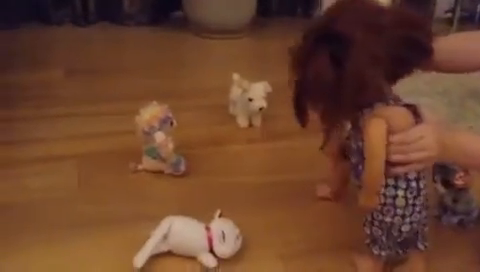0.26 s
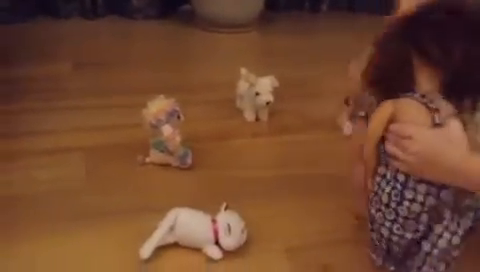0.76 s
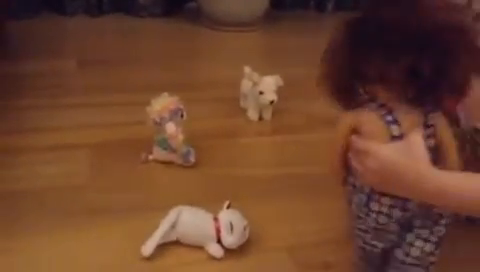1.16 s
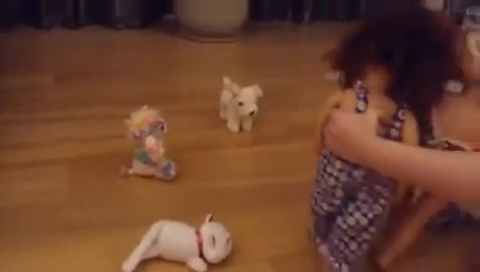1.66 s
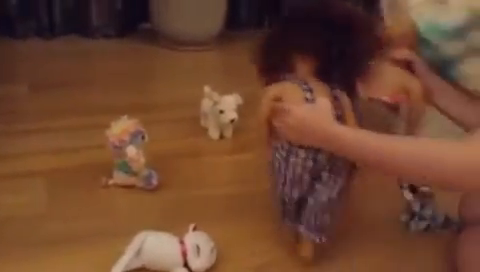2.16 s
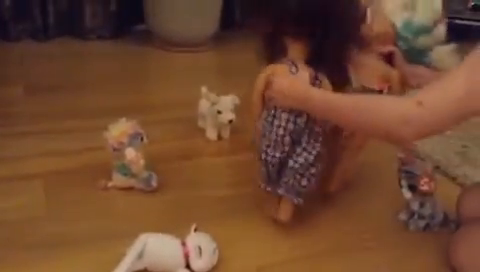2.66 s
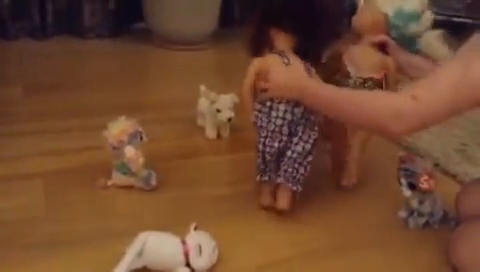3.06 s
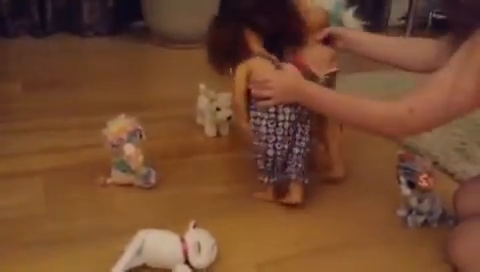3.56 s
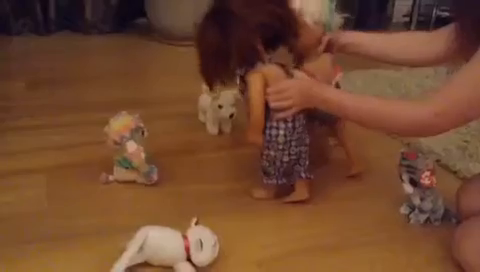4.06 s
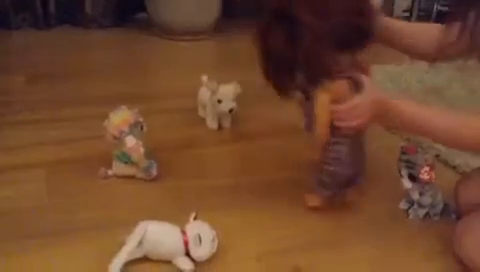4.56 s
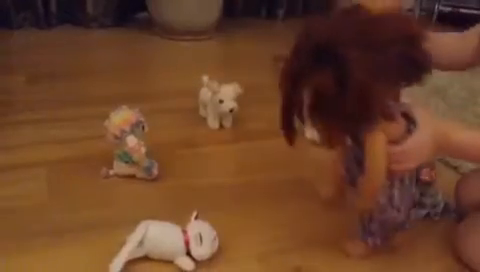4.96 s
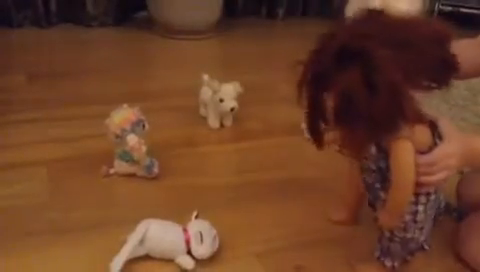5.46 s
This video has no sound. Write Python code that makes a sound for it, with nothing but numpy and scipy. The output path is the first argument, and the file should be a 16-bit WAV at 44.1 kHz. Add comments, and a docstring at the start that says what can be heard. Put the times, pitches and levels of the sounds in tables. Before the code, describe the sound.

A plastic doll is moved by hand on a wooden floor. Faint squeaks, rustle and barely audible taps open, then a quick run of firmer knocks just after one second. After a rustling pause, a sharp clack and lighter taps follow, another pair past three seconds, and a last strong knock near five. Furnished room with short reverb; small close microphone, thin bass, low steady hiss.

```python
"""A furnished room with a wooden floor, over which a plastic doll is walked by hand.
Its feet tap, each blow exciting damped modes of boards and hollow foot and the noise of a hard edge.
A tight joint squeaks as uneven slips drive a small cavity; dragging feet and cloth are coloured noise.
Single echoes and a dense tail answer from the room, over the shaped noise of room and small microphone."""
import sys
import numpy as np
from scipy import signal
from scipy.fft import rfft, irfft
from scipy.io import wavfile

SR = 44100
rng = np.random.default_rng(int(sys.argv[2]) if len(sys.argv) > 2 else 0)


def master_out(mix):
    """Clip the mix to full scale and print it as 16-bit PCM to the path in sys.argv[1]."""
    frames = np.transpose(np.atleast_2d(mix))
    ceiling = np.clip(frames, -1, 1)
    pcm = np.round(ceiling * 32767).astype(np.int16)
    wavfile.write(sys.argv[1], SR, pcm)


N = 251350

# Foot taps: (time [s], clack of the foot [dB], thud of the boards [dB], pitch favoured by the spot [Hz],
#             tick of the hard edge [dB], its top octave [dB], send to the room, more when far [dB])
FOOT_TAPS = [(0.3597, -48, -53.5, 600, -69, -72, 2.5), (0.61, -50, -61.5, 590, -63, -74, 10.5),
             (0.7363, -48, -45.5, 223, -67, -80, 0), (0.9204, -59, -48, 230, -75, -77, -3),
             (0.9364, -44, -65, 703, -59.5, -81, -4), (0.9807, -49.5, -64, 188, -69, -58, 7.5),
             (1.0288, -62, -53.5, 234, -76, -64, 3.5), (1.1255, -33.5, -46.5, 232, -47, -85, 4),
             (1.2088, -31, -34.5, 240, -46.5, -70, 1), (1.2283, -27, -37.5, 229, -49.5, -71, 0.5),
             (1.3688, -46, -46.5, 232, -64.5, -70, 6), (2.5713, -50, -80, 748, -72, -79, 4),
             (2.6638, -22, -24.5, 430, -39.5, -47.5, 5.5), (2.7511, -36, -43.5, 433, -46.5, -61, -1.5),
             (2.866, -36, -49.5, 300, -54, -63.5, 1), (2.906, -34, -48, 633, -50.5, -71, -1),
             (3.2838, -31, -47, 235, -45, -66, 1), (3.3708, -24, -27.5, 513, -39.5, -59, 2.5),
             (3.6432, -48.5, -57.5, 288, -64, -60, 5.5), (3.912, -49.5, -58, 530, -72, -69, 7.5),
             (4.4164, -55, -52, 513, -67, -86, 7), (4.4646, -40, -46.5, 283, -55, -77, 4),
             (4.4743, -41, -52, 735, -63, -66, -3), (4.4928, -44, -54, 314, -64, -74, -3),
             (5.0027, -33.5, -45.5, 227, -55.5, -79, 0), (5.1016, -51, -58, 614, -66, -67, 8),
             (5.158, -24.5, -25, 370, -44.5, -56.5, 3), (5.3229, -40, -36, 239, -84, -76, -2.0),
             (5.5228, -55, -59.5, 230, -81, -84, 5), (5.5757, -48.5, -60, 791, -47, -51.5, -0.5),
             (5.5957, -58, -62, 221, -63, -71, 2)]
# Joint squeaks: (time [s], peak level [dB], pitch [Hz], t60 of the slipping [s])
JOINT_SQUEAKS = [(0.0408, -43, 1802, 0.022), (0.1765, -57.5, 1820, 0.041), (0.3666, -50.5, 1730, 0.025),
                 (0.5681, -48, 1840, 0.027), (0.7208, -52, 1700, 0.056), (1.0969, -60, 1800, 0.052),
                 (2.153, -58, 1870, 0.13), (2.3755, -63, 1870, 0.046), (2.4700, -58.5, 1780, 0.12),
                 (2.492, -58.5, 1660, 0.2), (2.5711, -50, 1820, 0.073), (2.595, -60, 1930, .2),
                 (3.0245, -73, 2000, 0.065), (3.0973, -58, 1900, 0.2), (4.8, -65, 1610, 0.039),
                 (5.5797, -62, 2010, 0.065), (5.6121, -47.5, 1860, 0.031), (0.6294, -55, 1300, 0.11),
                 (0.6769, -59, 1260, 0.16), (3.5194, -59.5, 1166, 0.41), (5.4276, -63.5, 1315, 0.52)]
# Modes of the floorboards: (frequency [Hz], relative level [dB], t60 [s])
BOARD_MODES = [(175, -18, 0.015), (229.5, -3, 0.048), (273.4, -0.5, 0.055), (310, -1.5, 0.072),
               (430, -3, 0.08), (505, -1.5, .05), (560, 3, 0.029), (612, 1.5, 0.031), (730, -2.5, 0.036),
               (870, -5, 0.032)]
# Modes of the hollow foot: (frequency [Hz], relative level [dB], t60 [s])
FOOT_MODES = [(1300, -7.5, 0.0044), (1606, 5.5, 0.0031), (2136, -8, 0.0061), (2762, 8, 0.002),
              (3056, -7.5, 0.0021)]
# Strokes of feet and hand: (time of full level [s], hold [s], swell [s per 20 dB], fade [s per 20 dB],
#   drag of the feet [dB], pitch of the drag [Hz], rustle of cloth [dB], its brightness [dB per octave])
HAND_STROKES = [(0.0, .19, .05, .15, -67, 480, -71, -6), (.12, .025, .03, .04, -72, 900, -68, -5),
                (.46, .085, .05, .05, -56, 640, -66, -8), (.555, .02, .02, .04, -66, 700, -60, -3),
                (.615, .07, .03, .15, -65, 650, -65, -6), (.85, .06, .08, .08, -65, 600, -76, -3),
                (.98, .1, .02, .12, -66, 600, -63, 3), (1.15, .07, .05, .08, -54, 480, -58, -3),
                (1.38, .05, .05, .2, -63, 900, -63, -6), (1.46, .04, .05, .1, -70, 900, -65, -2),
                (1.59, .04, .2, .2, -60, 700, -62, -7), (1.69, .04, .05, .12, -70, 1000, -66, -3),
                (2.09, .02, .13, .06, -64, 850, -59, -5), (2.69, .06, .03, .15, -70, 450, -65, 3),
                (2.92, .06, .05, .15, -66, 880, -76, 0.5), (3.42, .05, .05, .22, -58, 600, -65, -4),
                (3.65, .04, .02, .15, -72, 900, -67, 4), (3.84, .1, .12, .12, -78, 400, -70, 1.5),
                (3.95, .15, .06, .08, -67, 620, -73, -4), (4.12, .07, .06, .1, -64, 550, -70, -6),
                (4.45, .03, .18, .06, -53, 600, -55, -8), (5.02, .12, .03, .06, -61, 600, -63, -11),
                (5.25, .07, .1, .15, -59, 400, -68, -15)]
# Reverberant tail: (frequency [Hz], t60 [s], relative level [dB])
ROOM_BANDS = [(120, 0.4, -14), (200, .33, -5), (400, 0.33, 1.5), (800, 0.38, -3.5), (2170, 0.22, 4),
              (5370, 0.28, 0.4), (12000, 0.34, -2.03)]
# Reflections from near walls and furniture: (delay [s], level [dB])
NEAR_ECHOES = [(.0075, -20), (0.0111, -8.5), (.017, -15), (.023, -16)]
# Spectrum of the steady noise: (frequency [Hz], relative spectral density [dB])
HISS_SPECTRUM = [(12, -46), (20, -14), (59, -11), (224, 9), (296, 8.5), (800, 2.5), (1200, -3), (1750, 1.5),
                 (2250, -3), (13700, -4), (15300, -8)]

GRIP_DB, GRIP_TILT_DB = -78, -1.5  # constant rustle of the holding hand: level, brightness per octave
DRAG_BOARDS_HZ, DRAG_BOARDS_DB = 240, -3  # the boards boom under every drag
ROOM_DB, HISS_DB = -5, -69.8
EDGE_HZ = 15450  # upper band limit


def taps():
    """Modal superposition: a footfall excites boards, foot and edge together; gives (direct, room send)."""
    direct, sent = np.zeros((2, N))
    chance = rng.standard_normal((len(FOOT_TAPS), 2, 2, len(BOARD_MODES)))
    chatter = rng.standard_normal((len(FOOT_TAPS), 4000))
    for tap, luck, noise in zip(FOOT_TAPS, chance, chatter):
        s, clack_db, thud_db, spot_hz, tick_db, top_db, room_db = tap
        thud = gain_of(thud_db) * struck(ring(BOARD_MODES, spot_hz, 4.3, luck[0], 0.001))
        clack = gain_of(clack_db) * peaked(ring(FOOT_MODES, 1600, 0, luck[1], 0.0009))
        edge = gain_of(tick_db) * tick(noise, 3500, 6800)
        edge = edge - gain_of(top_db) * tick(noise, 6800, 13000)
        near, spread = thud + clack + edge
        add(direct, s, near)
        add(sent, s, gain_of(room_db) * spread)
    return direct, sent


def ring(modes, spot_hz, spot_db, chance, rise_s):
    """Modal decay: a blow starts damped sines, weakened by spot_db per octave from the favoured pitch."""
    t = np.arange(4000) / SR
    hz, db, t60 = np.transpose(modes)[:, :, None]
    shift, weight = chance[:, :len(hz), None]
    db = db + 1.5 * weight - spot_db * abs(np.log2(hz / spot_hz))
    detuned_hz = hz * (1 + 0.025 * shift)
    y = (gain_of(db - 60 * t / t60) * np.sin(2 * np.pi * detuned_hz * t)).sum(0)
    return y * (1 - np.exp(-(t / rise_s) ** 2))  # the contact takes a moment to build


def tick(chatter, lo_hz, hi_hz):
    """Hard contact in one band: (decaying chatter heard directly, band impulse sent to the walls)."""
    t = np.arange(4000) / SR
    band = signal.butter(2, [lo_hz, hi_hz], "band", fs=SR, output="sos")
    burst = chatter * gain_of(-60 * t / 0.012) * (1 - np.exp(-t / 0.0005))
    impulse = 1. * (t == 0)
    return np.array([struck(signal.sosfilt(band, drive)) for drive in (burst, impulse)])


def pings():
    """Stick-slip excitation: a tight joint snaps, slips on unevenly, and rings its small cavity."""
    out, t = np.zeros(N), np.arange(5000) / SR
    chance = rng.standard_normal((len(JOINT_SQUEAKS), 5000))
    for (s, db, hz, t60), slips in zip(JOINT_SQUEAKS, chance):
        drive = 0.12 * slips * gain_of(-60 * t / t60)
        drive[0] = 1  # the snap
        pair = np.sin(2 * np.pi * hz * t) + 0.3 * np.sin(2 * np.pi * hz * 1.11 * t)
        cavity = gain_of(-60 * t / 0.021) * pair * (1 - np.exp(-t / 0.0015))
        squeak = peaked(signal.fftconvolve(drive, cavity)[:len(t)])
        add(out, s, gain_of(db) * squeak)
    return out


def handling():
    """Friction noise: feet scrape a broad board resonance, cloth rustles; strokes swell, hold and fade."""
    columns = np.transpose(HAND_STROKES)[:, :, None]
    s, held, swell, fade, drag_db, drag_hz, cloth_db, tilt_db = columns

    def stroke_power(t):
        steps_down = np.maximum((s - t) / swell, (t - s - held) / fade)  # in steps of 20 dB
        return gain_of(-20 * np.maximum(steps_down, 0)) ** 2

    def unit_power(db):
        power = gain_of(db) ** 2
        return power / np.mean(power, -1, keepdims=True)  # the colour keeps the total power

    def resonance(hz, top_hz):
        octaves = np.log2((hz.T + 1) / top_hz)
        return gain_of(-18 * np.log10(1 + (octaves / 0.6) ** 2))

    def drag_colour(hz):
        boom = gain_of(DRAG_BOARDS_DB) * resonance(hz, DRAG_BOARDS_HZ)
        return unit_power(20 * np.log10(resonance(hz, drag_hz) + boom))

    def cloth_colour(hz, tilt):
        above = tilt * np.log2(np.maximum(hz.T, 1500) / 1500)
        below = 9 * np.log2(np.maximum(1200 / (hz.T + 1), 1))
        return unit_power(above - below)

    def drag_map(hz, t):
        power = drag_colour(hz).T @ (gain_of(2 * drag_db) * stroke_power(t))
        return 10 * np.log10(power + 1e-20)

    def cloth_map(hz, t):
        power = cloth_colour(hz, tilt_db).T @ (gain_of(2 * cloth_db) * stroke_power(t))
        grip = gain_of(2 * GRIP_DB) * cloth_colour(hz, GRIP_TILT_DB).T
        return 10 * np.log10(power + grip)

    drag = shaped(crackle(900, 5.9, 1.4), drag_map)
    cloth = shaped(crackle(2000, 2.5, 1.2), cloth_map)
    return drag + cloth


def crackle(per_s, spread_db, smooth):
    """Stick-slip drive: random clicks of uneven size over a smooth share of noise."""
    size = gain_of(spread_db * np.minimum(rng.exponential(1, N), 4)) * rng.standard_normal(N)
    clicks = evened(size * (rng.random(N) < per_s / SR))
    return evened(clicks + smooth * rng.standard_normal(N))


def room(x):
    """Reverberation: a few single echoes, and a dense tail that builds up and dies band by band."""
    length = SR // 2
    pulses = np.zeros(length)
    at = np.arange(80, length - 16, 16)
    pulses[at + rng.integers(0, 16, len(at))] = rng.choice([-1., 1.], len(at))
    f, t60, db = np.transpose(ROOM_BANDS)

    def decay_map(hz, t):
        return read(np.c_[f, db], hz) - 60 * t / read(np.c_[f, t60], hz)

    tail = shaped(pulses, decay_map) * (1 - np.exp(-np.arange(length) / SR / 0.0068))
    tail /= np.linalg.norm(tail)
    for s, echo_db in NEAR_ECHOES:
        tail[round(s * SR)] += gain_of(echo_db)
    return signal.fftconvolve(x, tail)[:N]


def hiss():
    """Stationary noise of room and microphone: white noise weighted by a fixed spectrum."""
    weight = gain_of(read(HISS_SPECTRUM, np.fft.rfftfreq(N, 1 / SR)))
    spectrum = rfft(rng.standard_normal(N)) * weight
    return gain_of(HISS_DB) * evened(irfft(spectrum, N))


def shaped(x, db_of):
    """Time-varying filtering: colours x frame by frame with a level map over frequency and time."""
    hz, t, z = signal.stft(x, SR, nperseg=512, noverlap=384)
    z = z * gain_of(db_of(hz[:, None], t))
    return signal.istft(z, SR, nperseg=512, noverlap=384)[1][:len(x)]


def gain_of(db):
    """Level law: 20 dB is a factor of ten in amplitude."""
    return 10 ** (np.asarray(db) / 20)


def read(points, hz):
    """Interpolation of a table along logarithmic frequency."""
    f, value = np.transpose(points)
    return np.interp(np.log(hz + 1), np.log(f + 1), value)


def evened(x):
    """Normalisation to unit effective (RMS) value."""
    return x / np.sqrt(np.mean(x ** 2) + 1e-20)


def peaked(x):
    """Normalisation to unit peak."""
    return x / abs(x).max()


def struck(x):
    """Normalisation to unit RMS over the first 4 ms."""
    return x / np.sqrt(np.mean(x[:SR // 250] ** 2))


def add(mix, s, sound):
    """Superposition of a sound onto the mix from time s."""
    part = mix[round(s * SR):][:len(sound)]
    part += sound[:len(part)]


def scene():
    """Superposition of the direct sounds and the answer of the room."""
    direct, sent = taps()
    joint, rub = pings(), handling()
    to_room = sent + gain_of(-2.5) * joint + gain_of(-4) * rub
    return (direct + joint + rub + gain_of(ROOM_DB) * room(to_room))[None]


def record(dry):
    """Band limiting: a steep bass cut passes a trace of the deepest thump; hiss joins before the top cut."""
    thin = signal.sosfilt(signal.butter(9, 152, "high", fs=SR, output="sos"), dry)
    thump = gain_of(-3) * signal.sosfilt(signal.butter(3, 42, fs=SR, output="sos"), dry)
    top_cut = signal.firwin(511, EDGE_HZ, window=("kaiser", 9), fs=SR)[None]
    return signal.oaconvolve(thin + thump + hiss(), top_cut, "same")


dry = scene()
out = record(dry)
master_out(out)
```